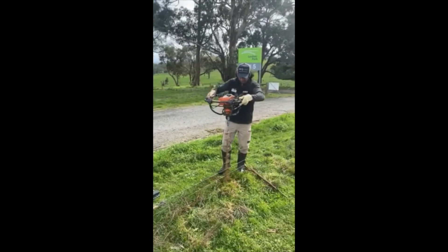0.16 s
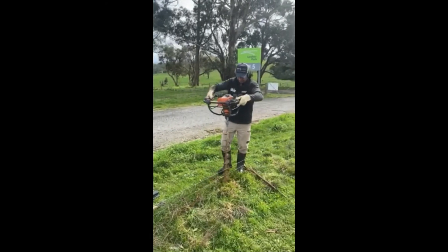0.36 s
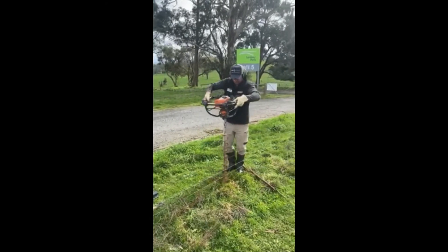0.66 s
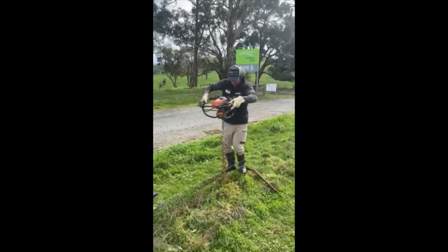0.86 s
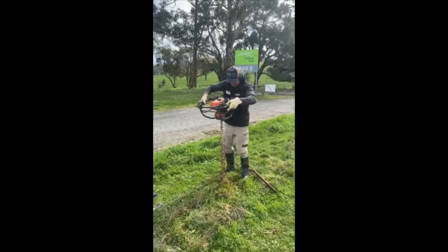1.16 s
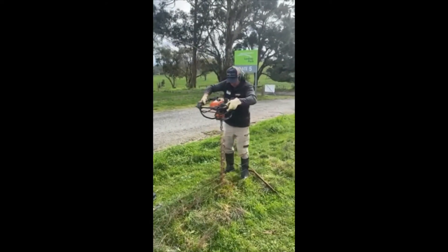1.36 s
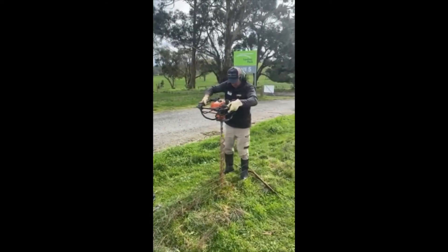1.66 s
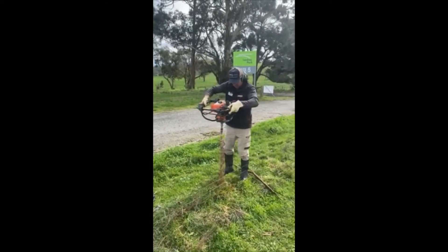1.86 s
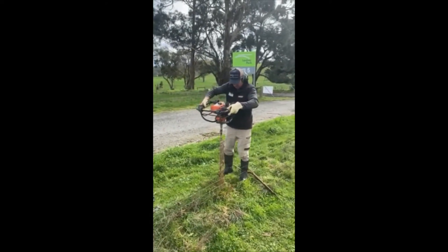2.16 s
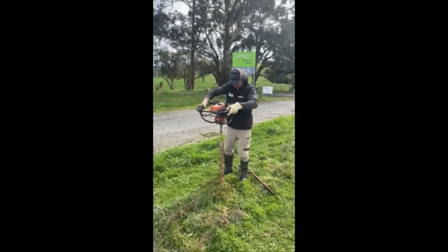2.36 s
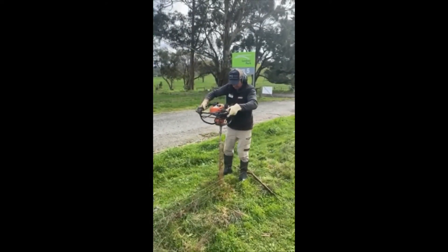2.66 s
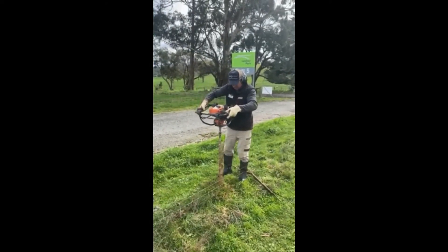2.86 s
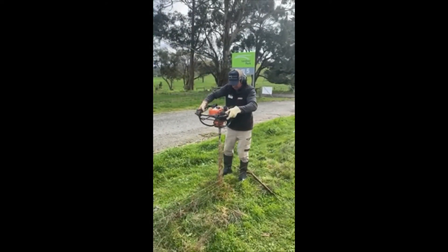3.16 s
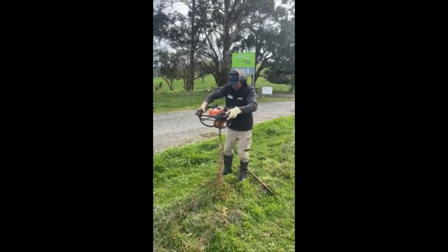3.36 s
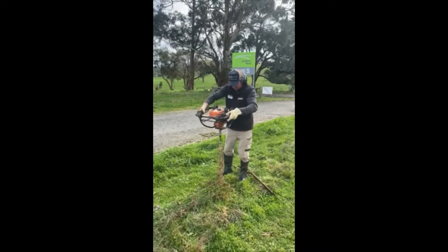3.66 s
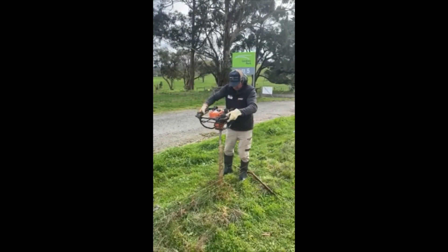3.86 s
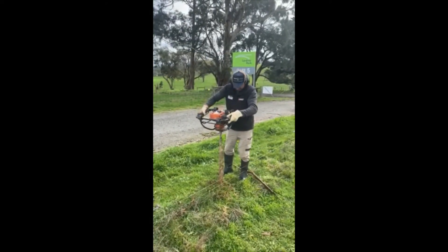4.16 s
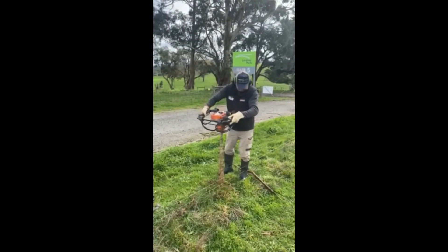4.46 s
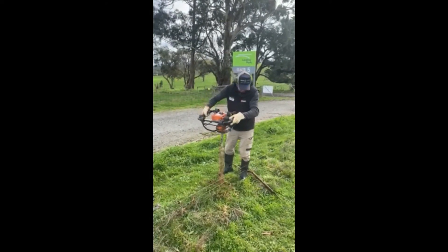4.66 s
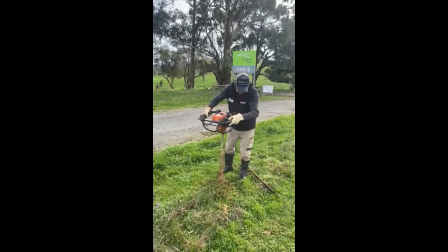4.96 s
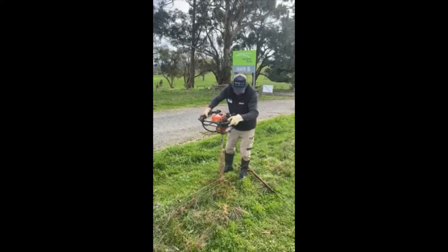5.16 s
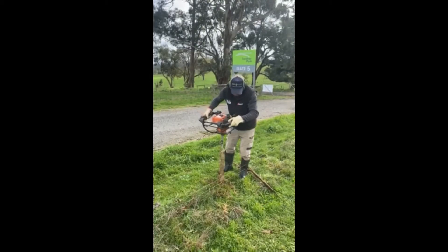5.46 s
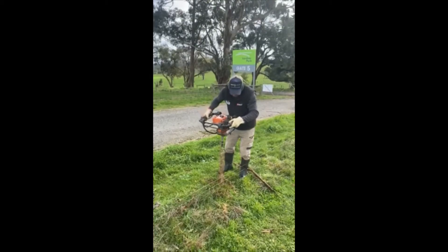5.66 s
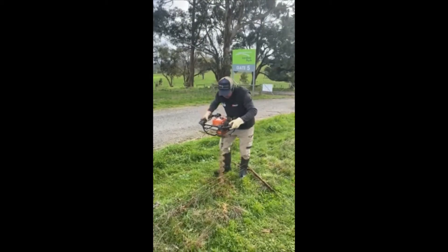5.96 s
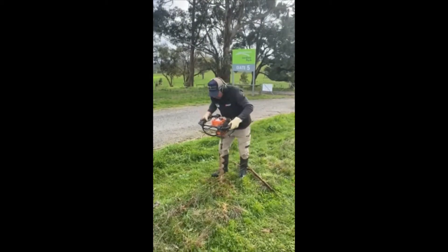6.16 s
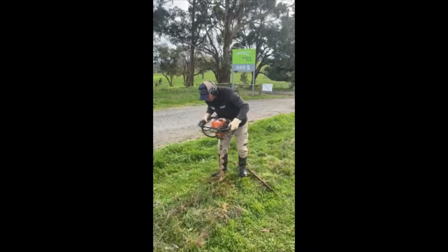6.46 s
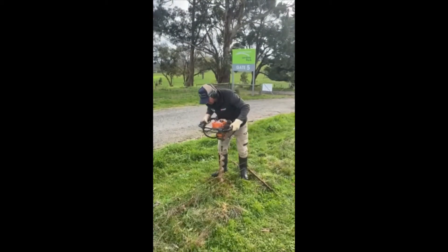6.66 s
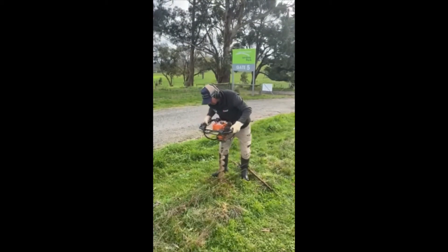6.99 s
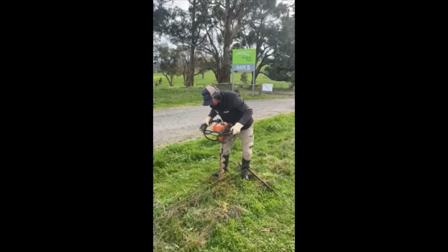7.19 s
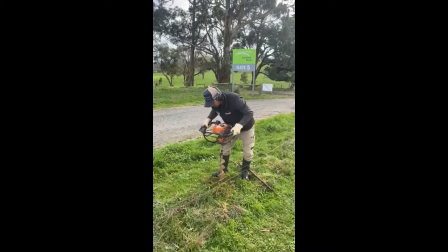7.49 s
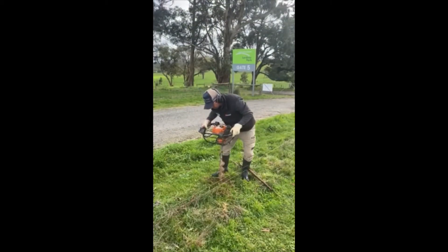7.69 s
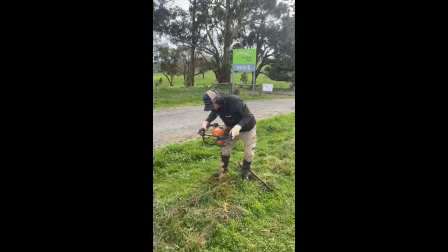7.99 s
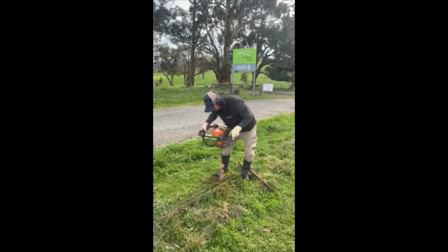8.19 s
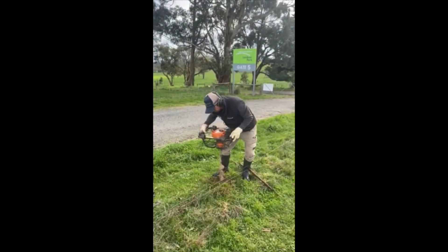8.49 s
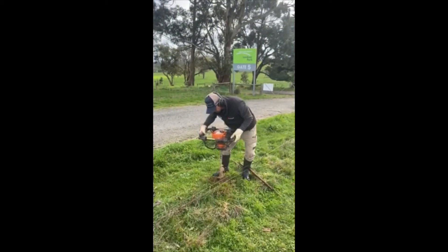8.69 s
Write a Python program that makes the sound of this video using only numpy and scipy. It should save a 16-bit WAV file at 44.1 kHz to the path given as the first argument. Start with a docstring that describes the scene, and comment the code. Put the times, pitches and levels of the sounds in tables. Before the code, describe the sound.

From 0 to about 1.3 seconds, a handheld petrol earth auger idles outdoors: about fifteen uneven hollow muffler pops a second, with dull thuds between them, a faint casing rattle and occasional thin metal clinks. Around 1.3 the throttle opens; the separate pops fuse into a growling buzz that climbs quickly to about 2.1. The pitch sags until 2.4, then rises again as the bit bites near 2.65. From 3 seconds it runs at full speed, a dense raspy roar with a buzzing exhaust note, wavering gear and fan whine and fluttering treble, creeping slightly higher until about 8, then easing a little near 8.8 without returning to idle. Low wind rumble and soft gust thumps hit the microphone throughout, strongest around 2 to 4.6 and again near 7.6. Close, dry, open-air stereo sound.

```python
"""Outdoors, a hand-held two-stroke earth auger idles, firing mostly every second to fourth turn, then is opened up,
sags, recovers as the bit bites and settles at full speed. Exhaust orders, gear and fan whine and half orders are
cosines locked to the crank; firings ring muffler resonances; the roar is coloured noise gated by each turn.
Loose metal clinks are dying sines. Gusts rumble as low noise on a pair of microphone ports."""
import sys
import numpy as np
from scipy import signal
from scipy.fft import rfft, irfft
from scipy.io import wavfile

SR = 44100
rng = np.random.default_rng(int(sys.argv[2]) if len(sys.argv) > 2 else 0)


def generate_wav(signal):
    """Clip the signal to [-1, 1] and save it as 16-bit WAV at the path in sys.argv[1]."""
    frames = np.transpose(np.atleast_2d(signal))
    scaled = np.clip(frames, -1, 1) * 32767
    pcm = np.round(scaled).astype(np.int16)
    wavfile.write(sys.argv[1], SR, pcm)


N = 389403   # length [samples]

# idle firings, and a few louder thuds of unfired turns with hardly any ring:
# (time [s], muffler ring drive [dB], thud minus ring before a common lift [dB])
FIRINGS = [(0.0445, -17.5, -7.5), (0.1264, -19.5, -5.5), (0.205, -18, -6), (0.2853, -15, -8),
           (0.3465, -35, 9), (0.366, -19, -4.5), (0.427, -19.5, -6), (0.471, -19.5, -2.5),
           (0.5117, -37, 10), (0.533, -22, -2.5), (0.595, -20, -3), (0.6582, -20.5, -4.5),
           (0.7236, -16.5, -7.5), (0.7866, -27, 0.5), (0.8086, -18.5, -5), (0.851, -36, 8),
           (0.8713, -37, 9), (0.8923, -35, 8), (0.9122, -20, -4), (0.972, -30.5, 3.5), (0.9964, -23.5, 1),
           (1.061, -20, -5.5), (1.123, -18.5, -6.5), (1.2034, -19, -5), (1.262, -24, 0),
           (1.2823, -19, -5.5), (1.3187, -18.5, -6), (1.3557, -15, -7.5), (1.3866, -14, -7)]
# tops of the orders at the exhaust outlet: (frequency [Hz], level [dB])
OUTLET = [(40, -19), (200, -2), (400, -1.5), (800, 0), (1250, -15), (1600, -11), (2000, -20.5), (2600, -9),
          (3100, -13.5), (3600, -16.5), (4500, -16.5), (5500, -27.5)]
# orders that stand out in spells, gear and fan whine and half orders: [multiples of the crank rate]
STANDOUT_ORDERS = (8, 11, 12, 13, 14, 15, 16, 19, 20, 24, 32, 9, 17, 21, 22, 23, 25, 27, 28, 34, 36, 38, 40,
                   11.5, 12.5, 14.5, 15.5, 10, 1.5, 2.5, 3.5, 4.5, 7.5, 9.5)
SPELL_RAMP_S = 0.08   # rise and fall of spells and dropouts


def engine():
    """The throttled engine: orders and muffler ring driven by one crank angle, with the roar's level and repeating noise."""
    # crank speed: (time [s], speed [turns per s])
    crank_speed = [(1.39, 68.9), (1.45, 75.2), (1.57, 78.2), (1.72, 103.2), (1.8, 115.1), (1.96, 133),
                   (2.08, 140.6), (2.17, 137.2), (2.26, 129.8), (2.36, 124.6), (2.51, 132.5), (2.69, 148.1),
                   (2.84, 154.1), (3.23, 161.8), (3.32, 164.4), (3.66, 166.4), (3.92, 171.4), (4.23, 171.7),
                   (4.66, 169.9), (4.93, 170.2), (5.18, 175.5), (5.62, 177), (6.03, 175.4), (6.1, 178.2),
                   (6.47, 181.3), (6.67, 180.8), (6.8, 179.4), (7.23, 176.8), (7.42, 178.1), (7.54, 180.3),
                   (7.9, 183.3), (8.31, 180.3), (8.43, 178.6), (8.79, 170.8)]
    # under throttle: (time [s], exhaust note [dB], roar before its trim [dB], muffler ring [dB])
    throttle = [(1.3, -33.5, -48, -38), (1.4, -28, -29.5, -36.5), (1.6, -24, -25.5, -29),
                (1.91, -27, -17, -31), (1.99, -25, -16.5, -27), (2.04, -25, -19.5, -43),
                (2.17, -27.5, -19.5, -30.5), (2.32, -31, -20.5, -26.5), (2.5, -28.5, -19, -31),
                (2.64, -24.5, -20.5, -30.5), (2.85, -23, -19.5, -36), (3.21, -24.5, -20.5, -35),
                (3.3, -25, -19, -49), (3.65, -27, -20, -64), (3.77, -26, -19.5, -38),
                (4.66, -26.5, -21, -36), (5.1, -25, -20.5, -44), (5.7, -23.5, -21.5, -36.5),
                (6.3, -20, -19.5, -57), (6.6, -21.5, -20, -40), (7.2, -21, -22, -47),
                (7.8, -17.5, -21, -46), (8.1, -19, -23, -47), (8.45, -20, -23, -43), (8.83, -22, -25, -36)]
    # the throttle opens: start, end [s]
    opening_s = (1.28, 1.305)
    loaded_from_s = 2.65   # the bit bites: upper orders clear up
    t = np.arange(N) / SR
    speed, = in_time(crank_speed)
    note_db, roar_db, ring_db = in_time(throttle)
    opened = np.interp(t, opening_s, [0, 1])
    loaded = np.clip((t - loaded_from_s) / 0.11, 0, 1)

    turns = np.cumsum(speed * (1 + 0.001464 * drift(25))) / SR
    turns -= turns[int(FIRINGS[-1][0] * SR)]   # carries on in step from the last idle firing

    bite = np.exp(-np.abs(t - loaded_from_s) / 0.28)   # peaks as the bit bites
    half_db = roar_db - 25 + 11 * bite
    tones = exhaust_orders(turns, speed, note_db, loaded)
    tones += standout_orders(turns, loaded)
    tones += faint_orders(turns, speed, roar_db - 10, half_db, loaded)
    pops = amp(ring_db) * hot_ring(turns, speed)
    return opened * tones + pops, opened * roar_gate(turns, roar_db), recurring(turns)


def exhaust_orders(turns, speed, note_db, loaded):
    """Exhaust pulses as harmonics of the crank: pipe-coloured while running free, separate spells under load."""
    # orders besides 2: [multiples of the crank rate]
    low_orders = (1, 3, 4, 5, 6, 7)
    # under load, one row an order: (resting level [dB], spells of (start [s], end [s], level [dB]))
    low_spells = [(-51.5, [(3.8, 4.5, -41), (6.9, 9, -45), (7.4, 9, -38.5), (8.3, 9, -34.5)]),
                  (-44.5, [(5.2, 9, -37), (5.75, 9, -37)]), (-45, [(3.2, 3.7, -43), (5.0, 8.7, -39),
                  (6.2, 6.7, -35), (7.3, 8.3, -36.5)]), (-43.5, [(3.65, 4.55, -36), (5.0, 5.7, -37),
                  (6.9, 9, -35)]), (-44.5, [(2.7, 3.3, -39.5), (4.7, 4.85, -37), (5.7, 8.5, -41),
                  (6.95, 8.3, -37)]), (-46, [(2.7, 3.9, -43), (7.1, 8.4, -32)])]
    # pipe and ground echo while running free: (frequency [Hz], level on the exhaust note [dB])
    pipe = [(75, -16), (115, -6), (140, -10), (170, -21), (205, -4.5), (235, -0.5), (300, 1.5), (350, -4.5),
            (420, -3), (470, -9.5), (530, 1), (600, -1), (700, -4), (760, -3.5), (830, 0), (900, -0.5),
            (980, -9)]
    # each order's own share while running free, orders 1 to 7 [dB]
    free_db = (1.9, -1.5, -0.5, -0.49, 2.3, 2.3, -2.8)
    t = np.arange(N) / SR
    # even orders start weak and catch up at 133 turns per s
    even_db = -7.5 * np.clip(4 - 4 * speed / 133, 0, 1)
    # one sharp pulse a turn, smeared while the clutch drags
    smear = np.interp(t, (1.5, 2.3, 2.7), [.1, .8, .45])
    loaded_levels = [spells(*row) for row in low_spells]
    out = 0
    for k, loaded_db in [(2, note_db), *zip(low_orders, loaded_levels)]:   # under load order 2 carries the note
        running_free_db = note_db + at_hz(pipe, k * speed) + free_db[k - 1] + dropout(k)
        if k % 2 == 0:
            running_free_db = running_free_db + even_db
        level_db = (1 - loaded) * running_free_db + loaded * loaded_db
        steadied_db = 2.0 if k == 2 else 1.2
        waver_db = (2.5 - steadied_db * loaded) * drift(18)
        out = out + order(turns, k, level_db + waver_db, apart=smear)
    return out


def dropout(k):
    """Loss in dB of order k in its dropouts during the run-up, sag and recovery."""
    # single orders fall away for a while: (order, start [s], end [s], level [dB])
    dropouts = [(1, 2.0, 2.4, -4), (2, 1.68, 1.8, -8), (3, 2.0, 2.2, -6), (3, 2.3, 2.75, -5),
                (4, 2.0, 2.6, -2), (4, 2.6, 2.75, -8), (5, 1.99, 2.42, -5), (5, 2.12, 2.42, -8),
                (6, 1.8, 2.75, -4), (6, 2.0, 2.75, -7), (7, 1.7, 1.8, -6), (7, 2.14, 2.3, -9)]
    t = np.arange(N) / SR
    loss_db = 0
    for dropped, start, end, db in dropouts:
        if dropped == k:
            loss_db = loss_db + db * np.clip(np.minimum(t - start, end - t) / SPELL_RAMP_S + .5, 0, 1)
    return loss_db


def standout_orders(turns, loaded):
    """Crank multiples that stand out in spells: gear and fan whine, and half orders from uneven firing."""
    # one row an order: (resting level [dB], spells of (start [s], end [s], level [dB]))
    standout_spells = [(-45.5, [(1.4, 1.6, -37), (1.7, 1.9, -29.5), (2.6, 2.85, -36), (3.65, 5.85, -38),
                       (4.1, 5.0, -37), (7.7, 8.45, -37)]), (-46, [(1.42, 1.6, -29.5), (1.6, 1.8, -39),
                       (2.95, 3.3, -34), (6.0, 7.0, -32.5), (7.1, 7.5, -34.5), (8.3, 8.7, -36)]),
                       (-56, [(1.42, 1.58, -31.5), (2.3, 2.5, -40), (2.8, 4.3, -41), (4.4, 4.98, -35),
                       (7.6, 8.1, -39)]), (-50.5, [(1.4, 1.5, -36), (1.6, 1.9, -38), (2.1, 2.2, -39),
                       (2.8, 3.05, -34), (3.8, 4.4, -34), (5.0, 5.7, -41), (5.6, 6.65, -34),
                       (6.7, 7.2, -39.5), (8.2, 8.7, -38)]), (-49.5, [(1.5, 1.7, -40.5), (1.8, 2.0, -50),
                       (2.62, 2.8, -35), (2.85, 3.25, -30), (4.2, 5.6, -39), (7.4, 8.2, -38.5),
                       (8.15, 8.4, -37)]), (-48, [(1.5, 1.6, -43), (2.1, 2.2, -39), (2.6, 2.8, -33),
                       (5.25, 5.5, -36.5), (5.9, 7.5, -39), (7.75, 8.25, -36.5), (8.3, 8.58, -31.5)]),
                       (-48.5, [(1.92, 2.0, -27), (2.09, 2.16, -25), (2.24, 2.32, -37), (2.48, 2.57, -26),
                       (2.75, 3.0, -32), (3.08, 3.38, -38), (3.45, 3.75, -40), (3.17, 3.33, -29),
                       (3.75, 4.72, -27), (5.15, 5.4, -41), (5.75, 6.1, -34), (6.15, 6.7, -42),
                       (7.55, 8.1, -39.5), (8.5, 9, -30.5)]), (-46.5, [(1.8, 1.88, -34), (2.02, 2.13, -28),
                       (2.6, 2.69, -28), (2.84, 3.1, -26), (2.84, 3.45, -31), (3.4, 3.8, -34.5),
                       (5.47, 5.72, -35), (5.8, 7.1, -39), (6.1, 6.55, -30.5), (7.45, 8.12, -32),
                       (8.3, 8.7, -36.5)]), (-46, [(1.75, 1.85, -38), (2.26, 2.34, -39), (2.8, 3.0, -40),
                       (3.95, 4.55, -41), (5.15, 5.65, -37), (6.05, 6.9, -38), (7.3, 7.8, -48)]),
                       (-43, [(3.25, 4.9, -36), (4.45, 4.7, -32.5), (5.0, 5.85, -37.5), (6.8, 7.0, -51),
                       (8.45, 8.65, -38.5)]), (-42.5, [(3.35, 4.3, -41), (5.1, 6.3, -41), (6.6, 7.5, -43),
                       (8.4, 9, -42)]), (-47.5, [(1.4, 1.5, -32), (1.9, 2.0, -33), (2.3, 2.6, -39),
                       (2.7, 4.8, -41.5), (3.4, 3.9, -41), (6.1, 6.9, -46)]), (-46.5, [(1.8, 2.8, -45),
                       (2.4, 2.5, -33), (2.8, 3.3, -38), (3.6, 3.9, -45), (6.0, 6.3, -39), (6.9, 8.4, -42),
                       (7.6, 8.4, -39.5)]), (-45, [(3.3, 4.2, -45), (4.8, 7.5, -43), (5.4, 5.7, -39)]),
                       (-56, [(3.05, 3.3, -35), (4.2, 5.3, -48), (7.2, 8.4, -45)]), (-58, [(2.8, 3.3, -46),
                       (5.15, 5.7, -39.5), (6.05, 6.6, -40), (6.9, 8.1, -44)]), (-54, [(3.3, 4.5, -40.5),
                       (6.6, 7.2, -43), (7.3, 8.7, -45.5)]), (-47, [(3.1, 3.6, -44), (6.3, 6.9, -50),
                       (7.5, 8.1, -54)]), (-56, [(2.8, 3.6, -41.5), (6.0, 6.3, -55), (6.9, 7.8, -42),
                       (8.2, 8.4, -58)]), (-57.5, [(4.5, 4.8, -47), (6.9, 7.8, -41.5), (8.1, 8.4, -43)]),
                       (-61, [(3.0, 4.5, -49), (6.0, 6.6, -41), (6.9, 7.2, -51), (8.1, 8.4, -40)]),
                       (-62.5, [(3.0, 3.3, -37), (5.5, 7.8, -43), (8.4, 9, -43)]), (-59.5, [(2.8, 3.4, -45),
                       (3.9, 5.1, -43.5), (6.0, 7.5, -57)]), (-61.5, [(3.3, 5.1, -43), (6.6, 7.2, -52)]),
                       (-56, [(2.8, 3.6, -51), (3.9, 6.0, -45)]), (-55, [(2.8, 3.3, -45), (5.1, 7.2, -47),
                       (6.3, 6.9, -42), (7.5, 8.4, -41)]), (-52, [(2.8, 5.1, -47.5), (4.2, 5.1, -44),
                       (5.7, 6.9, -39)]), (-46, [(1.6, 2.0, -39), (2.0, 2.3, -48), (3.05, 3.3, -41),
                       (4.6, 7.2, -46.5), (6.0, 6.3, -42), (8.4, 9, -41)]), (-51.5, [(2.7, 5.5, -36),
                       (5.5, 8.4, -42)]), (-51.5, [(2.7, 4.5, -39.5), (4.8, 5.7, -39.5), (5.7, 8.2, -41)]),
                       (-61, [(2.7, 4.5, -38.5), (4.5, 5.7, -42)]), (-48.5, [(2.7, 3.9, -44),
                       (4.9, 7.0, -43.5), (7.0, 8.4, -37.5)]), (-57, [(3.0, 4.5, -44), (7.3, 8.0, -49)]),
                       (-54, [(3.3, 6.0, -49.5), (3.7, 4.5, -40)])]
    out = 0
    for k, row in zip(STANDOUT_ORDERS, standout_spells):
        high = k > 26   # the top orders flutter more and sit lower
        # broken up until the load steadies it
        flutter_db = (3.2 - 1.5 * loaded + 1.5 * high) * drift(25)
        flutter_db = flutter_db - 1.5 * high + .6 * drift(2.5)
        tone = order(turns, k, spells(*row) + flutter_db)
        out = out + tone * (loaded if k % 1 or k > 20 else 1)
    return out


def faint_orders(turns, speed, other_db, half_db, loaded):
    """The remaining crank multiples, shaped by the outlet; half orders come from uneven firing over two turns."""
    out = 0
    for k in sorted(set(range(18, 32)) - set(STANDOUT_ORDERS)):
        swell_db = 3 * drift(1.2) + 2 * drift(20)   # each swells, fades and flutters on its own
        tone = order(turns, k, other_db + at_hz(OUTLET, k * speed) + swell_db)
        out = out + (loaded if k > 20 else 1) * tone
    for k in sorted(set(np.arange(.5, 20)) - set(STANDOUT_ORDERS)):
        out = out + loaded * order(turns, k, half_db + at_hz(OUTLET, k * speed) + 2.9 * drift(4.4))
    return out


def order(turns, k, db, apart=1):
    """A cosine at k times the crank rate, in step with the firing (apart 0) or at a chance phase (1)."""
    start = apart * (rng.random() - .5)
    return np.sqrt(2) * amp(db) * np.cos(2 * np.pi * (k * (turns - .1) + start))


def spells(rest_db, rows):
    """Level in dB of an order that rests, and rises for each spell; spells add as power."""
    t = np.arange(0, N + 64, 64) / SR
    power = amp(2 * rest_db)
    for start, end, db in rows:
        # ramps lie mostly before the start and after the end
        presence = np.clip(np.minimum(t - start, end - t) / SPELL_RAMP_S + 0.57, 0, 1)
        power = power + amp(2 * db) * presence
    return np.interp(np.arange(N) / SR, t, 10 * np.log10(power))


def hot_ring(turns, speed):
    """Every firing, a clean pulse and a puff of turbulence, rings the hot muffler modes."""
    # muffler modes under throttle: (frequency [Hz], width [Hz])
    hot_modes = [(2110, 153), (2360, 150), (2690, 140), (3500, 130), (4300, 150)]
    # the ring shifts between modes as the gas heats: (time [s], five levels on the muffler ring, one a mode [dB])
    mode_shares = [(1.38, 11, 0, -23, -19, -26), (1.6, -4, -2, -14, -22, -24), (1.78, -6, 0.5, 3, -12, -9),
                   (1.92, 4.5, -21, -11, -6, -4), (2.1, -2, -1.5, -5, -7, -14), (2.32, 1, -12, -9, -10, -9),
                   (2.6, -9, -4, -9, -6, -10), (2.9, -10, 3, -6, -10, -8), (3.3, -4, -6.5, 1.5, -6, -14.5)]
    # turbulent share of what rings the can: (time [s], share of power [0-1])
    roughness = [(1.4, .12), (1.75, .15), (2.1, .35), (2.2, .6), (2.6, .5)]
    # the can starts ringing 0.13 turn before the firing mark
    fires = (np.diff(np.floor(turns + .13), prepend=0) > 0) & (turns > .5)
    puff = rng.standard_normal(N) * np.exp(-3 * (turns % 1)) * (turns > 1)
    share, = in_time(roughness)
    out = 0
    for (hz, width), share_db in zip(hot_modes, in_time(mode_shares)):
        clean = rms_one(ring(fires / np.sqrt(speed), [(hz, width, 0)], spread_db=1.5))
        rough = rms_one(ring(puff, [(hz, width, 0)], spread_db=0))
        out = out + amp(share_db) * (np.sqrt(1 - share) * clean + np.sqrt(share) * rough)
    return out


def roar_gate(turns, roar_db):
    """Roar envelope: gas leaves in one puff a turn, and each turn is a little stronger or weaker."""
    gate = 1 + .27 * np.cos(2 * np.pi * (turns - .15))
    stroke = (turns - turns[0]).astype(int)
    stroke_db = 1.8 * rng.standard_normal(stroke[-1] + 1)[stroke]
    flicker_db = 0.9 * drift(19) + stroke_db
    return amp(roar_db - 5 + flicker_db) * gate


def recurring(turns):
    """Noise tied to crank angle that is partly kept from one two-turn cycle to the next: faint, wavering orders."""
    survives = 0.75   # how much of one cycle carries into the next
    since_start = turns - turns[0]
    cycles = int(since_start[-1]) // 2 + 2
    fresh = rng.standard_normal((cycles, 512))   # 512 steps of crank angle a cycle
    by_angle = signal.lfilter([1], [1, -survives], fresh, axis=0).ravel()
    return rms_one(by_angle[(since_start * 256).astype(int)])


def roar_noise(white, repeating):
    """Gas, fan air and casing: coloured noise, part of which recurs every two turns on the first channel."""
    # roar colour: (frequency [Hz], level per Hz [dB])
    roar_colour = [(60, -20.5), (150, -10), (400, -2), (1000, 0), (1600, -1), (2200, 1), (2800, 0.5),
                   (3080, 0), (3270, -1.5), (3580, -1), (3900, -3), (4230, 0), (5000, -4), (6500, -3.5),
                   (7700, -4.5), (8600, -7.5), (9200, -12), (11000, -16), (11500, -20.5), (11900, -22.5)]
    repeat_share = 0.5   # share of the power
    second = np.array([repeating, white[1]])
    gas = np.sqrt(1 - repeat_share) * white + np.sqrt(repeat_share) * second
    return raspy(coloured(roar_colour, gas))


def raspy(roar):
    """The treble of the roar comes in patches: narrow bands flare up and sink, each on its own."""
    # edges of neighbouring treble bands [Hz]
    rasp_edges = (4400, 4800, 5200, 5700, 6200, 6800, 7500)
    rasp_db = 2.2
    out = roar
    for low, high in zip(rasp_edges, rasp_edges[1:]):
        band_pass = signal.butter(2, [low, high], "band", fs=SR, output="sos")
        band = signal.sosfiltfilt(band_pass, roar)
        patch_db = rasp_db * (drift(4) + drift(14)) - rasp_db
        out = out + band * (amp(patch_db) - 1)
    return out


def idle():
    """Firings ring the muffler and thud; unfired turns pump a soft thud. Also gives the gas jet envelope."""
    # muffler can: (frequency [Hz], width [Hz], level [dB])
    muffler = [(1195, 120, -10), (2072, 154, 1), (2280, 200, -11.5), (2370, 360, -14), (2880, 250, -23),
               (3460, 120, -30), (4170, 26, -26), (5980, 770, -13)]
    # crankcase and intake thud: (frequency [Hz], width [Hz], level [dB])
    thud_modes = [(222, 265, 2), (567, 213, 3.5), (824, 140, -6.5)]
    # an unfired turn sounds mostly the lowest thud: (frequency [Hz], width [Hz], level [dB])
    pump_modes = [(225, 200, 4), (400, 120, -8), (570, 213, -5), (870, 133, -14)]
    idle_turns_per_s, unfired_db = 48, -27.5
    s, ring_db, thud_db = np.transpose(FIRINGS)
    fired, thuds, pumps = np.zeros((3, N))
    gaps = np.diff(s, prepend=2 * s[0] - s[1])
    for end, gap in zip(s, gaps):
        turns = max(round(gap * idle_turns_per_s), 1)
        jitter_s = 0.0014 * rng.standard_normal(turns - 1)
        unfired_s = end - gap * np.arange(1, turns) / turns + jitter_s
        at = (unfired_s * SR).astype(int)
        pumps[at[at >= 0]] = amp(unfired_db)

    at = (s * SR).astype(int)
    fired[at] = amp(ring_db)
    thuds[at + int(.0015 * SR)] = amp(ring_db + thud_db + 3.0)   # the thud trails the ring
    fade = np.exp(-1 / (0.005 * SR))
    # the jet swells and dies after each firing
    jet = signal.lfilter([np.e * (1 - fade)], [1, -2 * fade, fade ** 2], fired)
    firings = ring(fired, muffler, spread_db=2.5) + ring(thuds, thud_modes, spread_db=2.5)
    return firings + ring(pumps, pump_modes, spread_db=2.5), jet


def clinks():
    """A loose metal part clinks on some firings: each clink is one dying sine."""
    # (time [s], peak level [dB], pitch [Hz], 60 dB decay [s])
    clink_hits = [(0.2867, -31.5, 4110, .07), (0.4284, -28, 2880, .06), (1.061, -34, 4110, 0.17),
                  (1.1218, -40, 4090, 0.12), (1.3558, -35, 4860, 0.064), (1.3892, -23.5, 4880, 0.08)]
    out, t = np.zeros(N), np.arange(SR // 4) / SR
    for s, level_db, hz, t60 in clink_hits:
        out[int(s * SR):][:len(t)] += amp(level_db - 60 * t / t60) * np.sin(2 * np.pi * hz * t)
    return out


def idle_rattle(white):
    """Casing rattle and air: a steady bed of coloured noise."""
    # (frequency [Hz], level per Hz [dB])
    rattle_colour = [(50, -37), (120, -4), (250, 0), (550, -1.5), (1000, -8), (1600, -9.5), (2200, -6.5),
                     (2900, -12), (3250, -22), (3520, -9), (3900, -18.5), (4500, -18.5), (5500, -10.5),
                     (7000, -33), (9000, -9.5), (11500, -14.5)]
    return amp(-36) * coloured(rattle_colour, white)


def wind():
    """Turbulence on the ports: lumpy low rumble with single gusts, nearly alike on both."""
    # breeze before its random lumps: (time [s], level [dB])
    breeze = [(0, -40.5), (0.8, -40), (1.1, -36), (1.3, -46), (1.65, -37.5), (2.35, -29), (3.15, -24.5),
              (3.5, -34), (4.0, -26.5), (4.55, -29.5), (4.63, -38), (5.3, -40), (5.8, -45), (6.1, -46),
              (6.8, -45), (7.35, -41), (7.65, -29.5), (8.2, -37.5), (8.83, -34.5)]
    # rumble colour: (frequency [Hz], level per Hz [dB])
    wind_colour = [(20, -40.5), (40, -19.5), (80, -9.5), (130, -13.5), (220, -19), (400, -32.5)]
    # gusts that strike the ports, before the lumps: (time of the peak [s], level [dB])
    strikes = [(0.12, -35), (0.39, -39), (0.93, -36), (0.958, -26), (0.982, -25), (1.4, -32), (1.52, -30),
               (2.09, -24), (2.24, -35), (2.48, -30), (2.85, -36), (3.05, -28), (3.86, -33), (4.13, -25),
               (4.23, -34), (4.31, -28), (4.43, -33), (4.51, -27), (4.55, -29), (4.92, -43), (5.09, -33),
               (5.39, -39), (6.47, -37), (7.5, -43), (7.58, -30), (7.91, -32), (8.11, -53), (8.43, -41),
               (8.52, -33), (8.71, -30)]
    gust_s = 0.018   # half width
    t = np.arange(N) / SR
    gusts = sum(amp(db) * np.exp(-((t - s) / gust_s) ** 2) for s, db in strikes)
    breeze_level = amp(in_time(breeze)[0] + 2.5 * drift(8))
    lumps = (breeze_level + gusts) * amp(2.5 * drift(20))
    mid, side = coloured(wind_colour, rng.standard_normal((2, N)))
    rumble = lumps * (mid + amp(-14.5) * side * [[1], [-1]])
    return signal.sosfilt(signal.butter(4, 600, fs=SR, output="sos"), rumble)


def ports(direct, scattered):
    """The body around the ports shades and delays the two differently; scattered sound differs between them."""
    # (frequency [Hz], left-right likeness [0-1], left minus right [dB], left leads by [rad])
    port_pair = [(170, 0.94, 0.3, -0.1), (300, 0.95, 0.5, -0.77), (550, 0.94, -1.2, -0.82),
                 (900, 0.85, -4.8, -1.21), (1200, 0.38, -6.3, 1.17), (1500, 0.68, -3.5, 0.28),
                 (2200, 0.9, -2.0, 0.57), (2700, 0.64, -5.7, 0.78), (3300, 0.66, -4.8, 1.2),
                 (4000, 0.71, -3.0, 0.69), (5000, 0.47, -1.8, 0.86), (5700, 0.57, 0.9, 1.51),
                 (6400, 0.66, 0.4, 2.49), (7300, 0.83, 0.1, 3.02), (9000, 0.96, 0.0, 3.15)]
    notch_hz, notch_width_hz, notch_db = 3250, 65, -4   # a narrow dip in everything the engine sends
    hz = np.fft.rfftfreq(N, 1 / SR)
    centres, *columns = np.transpose(port_pair)
    alike, left_db, lead = (np.interp(hz, centres, c) for c in columns)
    dull = 1 / (1 + (hz / 9000) ** 8)   # scattered sound loses its top
    common = np.sqrt((1 + alike) / 2) * rfft(direct)
    differing = np.sqrt((1 - alike) / 2) * rfft(scattered) * dull
    tilt = amp(left_db / 2) * np.exp(.5j * lead)
    dip = amp(notch_db * np.exp(-((hz - notch_hz) / notch_width_hz) ** 2))
    return irfft([(common + differing) * tilt * dip, (common - differing) / tilt * dip], N)


def ring(clicks, modes, spread_db):
    """Each resonance applied three times: a burst that swells, then dies; every click drives each mode differently."""
    out, at = 0, np.flatnonzero(clicks)
    for k, (hz, width, level_db) in enumerate(modes):
        r = np.exp(-np.pi * width / SR)
        resonance = [1, -2 * r * np.cos(2 * np.pi * hz / SR), r * r]
        burst = clicks + 1e-18
        burst[at] *= amp(level_db + spread_db * rng.standard_normal(len(at)))
        for _ in range(3):
            burst = signal.lfilter([1, 0, -1], resonance, burst)
        out = out + (-1) ** k * burst * (1 - r) ** 2   # neighbours in opposite polarity
    return out


def coloured(spectrum, x):
    """Noise shaped by a spectrum; rms 1."""
    hz = np.fft.rfftfreq(N, 1 / SR)
    return rms_one(irfft(rfft(x) * amp(at_hz(spectrum, hz)), N))


def drift(rate):
    """Slow random wander with spread 1; a higher rate moves faster."""
    r = np.exp(-80 * np.pi * rate / SR)   # one step every 40 samples
    steps = rng.standard_normal(N // 40 + 2002)
    slow = signal.lfilter([1], [1, -2 * r, r * r], steps)[2000:]
    return np.interp(np.arange(N) / 40, np.arange(len(slow)), rms_one(slow))


def in_time(rows):
    """Columns of a curve table, one value per sample."""
    s, *columns = np.transpose(rows)
    return [np.interp(np.arange(N) / SR, s, c) for c in columns]


def at_hz(points, hz):
    """A spectrum table read on a log-frequency axis."""
    f, value = np.transpose(points)
    return np.interp(np.log(hz + 1), np.log(f + 1), value)


def amp(db):
    """Decibels to gain."""
    return np.exp(np.asarray(db) * (np.log(10) / 20))


def rms_one(x):
    """Scale to unit rms."""
    return x / np.sqrt(np.mean(x ** 2, axis=-1, keepdims=True) + 1e-20)


def scene():
    """Engine, its ground bounce and roar through the ports, wind on them."""
    pops, jet = idle()
    tones, roar_level, repeating = engine()
    white = rng.standard_normal((2, N))
    roar = roar_noise(white, repeating) * (roar_level + amp(-18.0) * jet)
    roar = roar + idle_rattle(white[::-1, ::-1])   # channels swapped and reversed in time
    clean = pops + tones + clinks()
    bounce = np.pad(clean, (int(.004 * SR), 0))[:N]   # off the ground, 4 ms late
    return ports(clean + roar[0], bounce + roar[1]) + wind()


def record(dry):
    """A steep low-pass cuts the top."""
    cutoff_hz = 11850
    return signal.sosfilt(signal.ellip(10, .5, 70, cutoff_hz, fs=SR, output="sos"), dry)


dry = scene()
out = record(dry)
generate_wav(out)
```